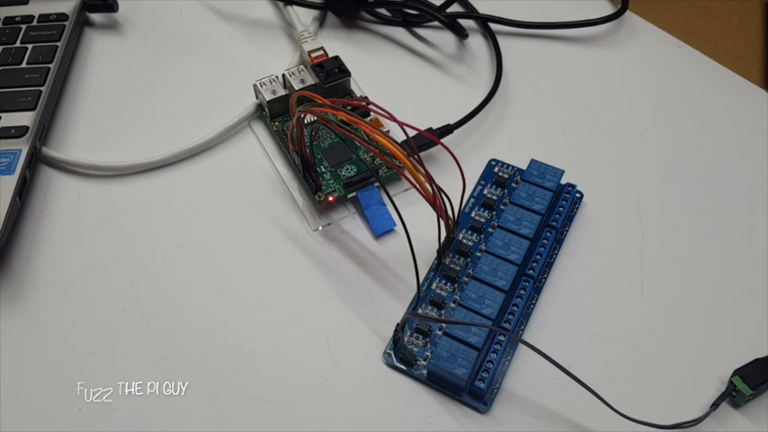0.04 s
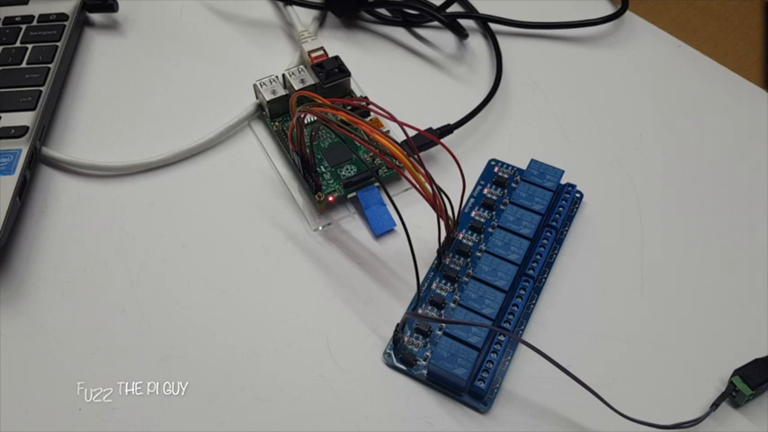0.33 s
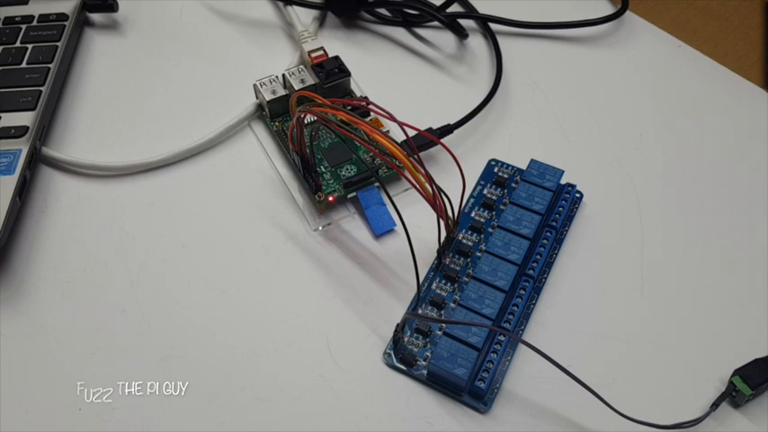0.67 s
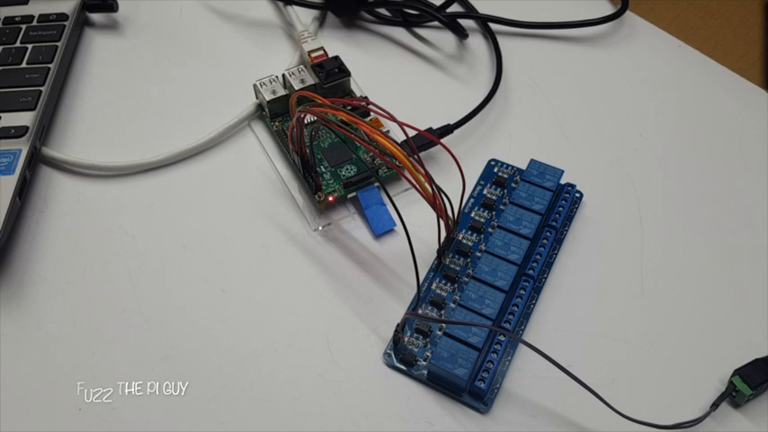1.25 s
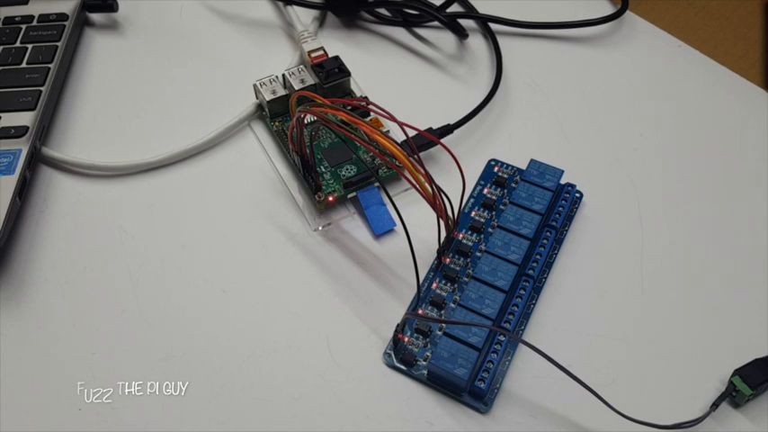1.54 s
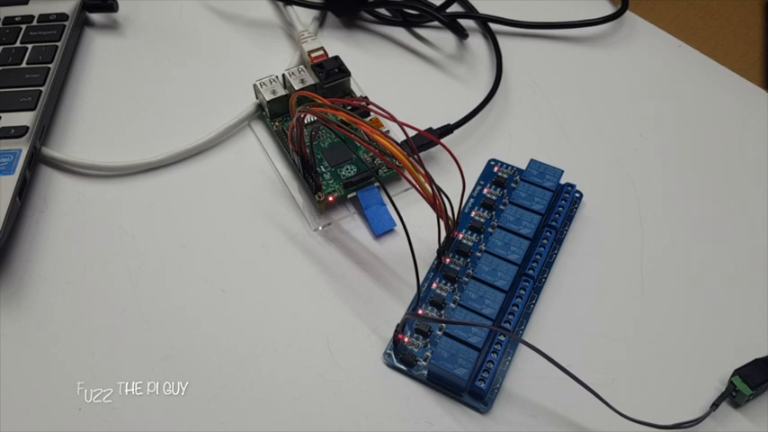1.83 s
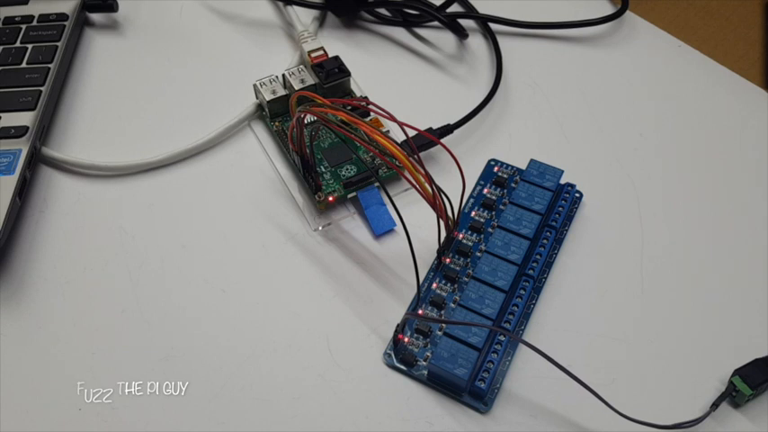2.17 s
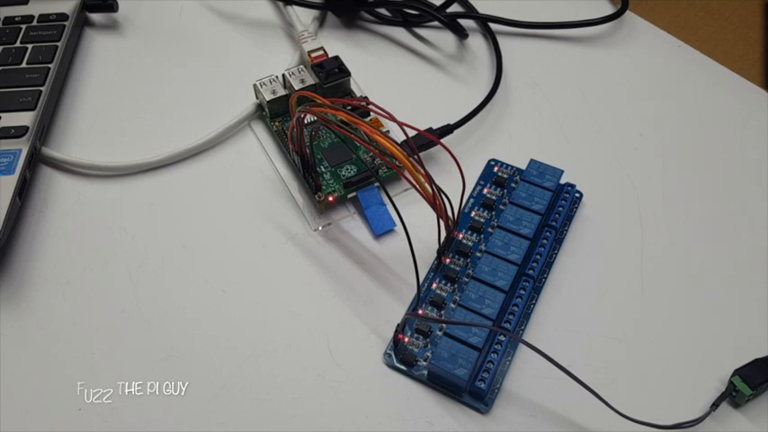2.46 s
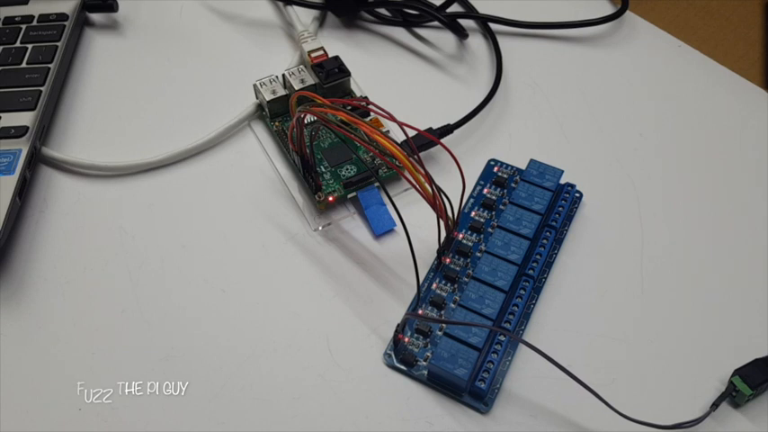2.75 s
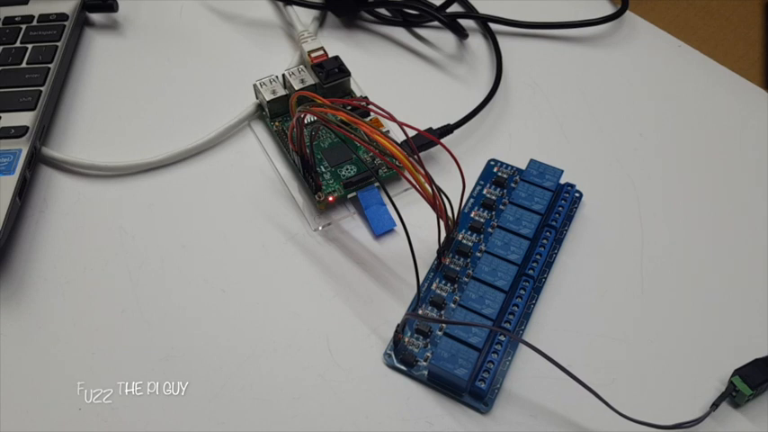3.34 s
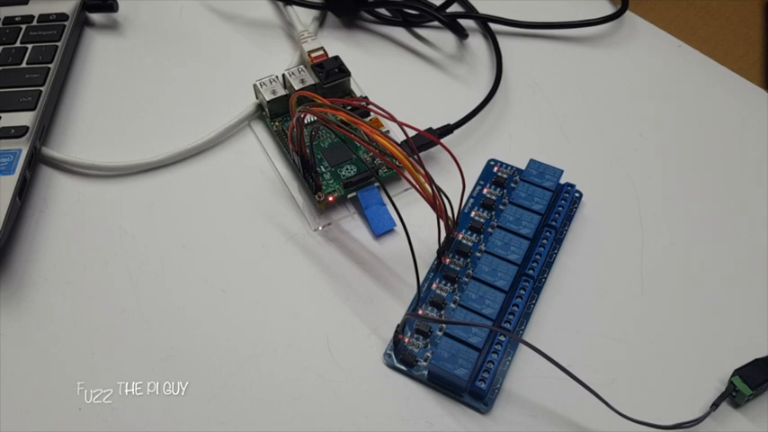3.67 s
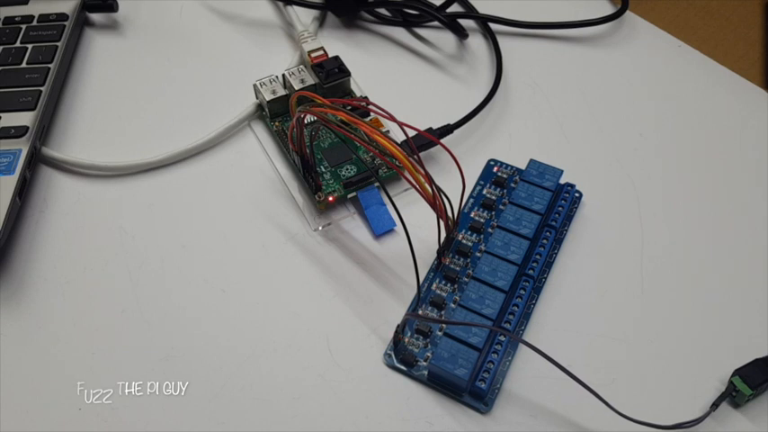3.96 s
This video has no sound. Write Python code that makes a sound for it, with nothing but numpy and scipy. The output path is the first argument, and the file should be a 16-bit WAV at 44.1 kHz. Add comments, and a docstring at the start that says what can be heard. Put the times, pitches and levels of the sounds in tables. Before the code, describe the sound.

A small relay on a desk clicks on and off in six quick bursts, sharp and close to the microphone. Some clicks carry a dull thud, and a steady electrical hum fills the small room.

```python
"""Sharp, close clicks in six bursts: a small relay on a desk switches on and off five times a burst.
Pulling in, its contact spring rattles, then the armature slams home, bounces and rings the cover.
Letting go, the spring chatters and the board under the relay rings. Two lone ticks follow at the end.
Some sharp clicks carry the dull thud of the microphone overloading.
The desk and a small room answer, over a steady electrical hum."""
import sys
import numpy as np
from scipy import signal
from scipy.fft import rfft, irfft
from scipy.io import wavfile

SR = 44100
rng = np.random.default_rng(int(sys.argv[2]) if len(sys.argv) > 2 else 0)


def unload_audio(sound):
    """Save the sound as a 16-bit wav file, at the path given as the first command line argument."""
    columns = np.transpose(np.atleast_2d(sound))
    # keep every value between -1 and 1, then stretch to whole-number steps
    steps = np.round(np.clip(columns, -1, 1) * 32767)
    wavfile.write(sys.argv[1], SR, steps.astype(np.int16))


N = 176400

# the armature slams home (time [s], blow [dB], overload thud [dB], cover ring [dB], last bounce delay [ms])
PULL_INS = [(0.1202, -3.5, -15, -17, 8.1), (.22, -5.5, -18, -5, 9.6), (0.3199, -3.5, -12.5, -7, 9.8),
            (.429, -4.5, -18, -3, 9.8), (0.5196, -4, 0.5, -11, 8), (.7694, -3.5, -14, -8.5, 8.6),
            (0.8695, -3, -12, -9, 8.3), (0.9703, -4, -1, -9, 9), (1.0694, -4, -15, -6, 9.3),
            (1.1691, -4, -15.5, -5.5, 9.4), (1.4289, -4, -5, -15, 7.4), (1.5193, -4, -13.5, -18, 7.7),
            (1.6202, -4, -10, -16, 7.7), (1.7295, -3, -8.5, -11, 10.6), (1.8296, -4.5, -14, -2, 10),
            (2.0799, -4.5, -18, -2, 10.5), (2.17, -4.5, -15.5, -4, 7.9), (2.27, -4.5, -8.5, -6, 9.8),
            (2.3801, -3.5, -10, -10, 7.3), (2.479, -3, -21, -11.5, 10.2), (2.7197, -2.5, -12.5, -6.5, 8.9),
            (2.8187, -3.5, -18, -11, 5.7), (2.909, -4.5, -17.5, -7.5, 8.6), (3.0204, -3, -11, -3, 9.5),
            (3.12, -2, -1, -2.5, 9.3), (3.4595, -3, -34, -10, 9), (3.5597, -4, -12, -6, 8.9),
            (3.6598, -2, -15, -10, 9.2), (3.76, -3.5, -11.5, -4, 9.1), (3.8592, -4.5, -14.5, -2.5, 10.3)]
# the relay lets go (time [s], level [dB])
RELEASES = [(0.168, -5), (0.2669, -5), (0.3577, -4.5), (0.4578, -4.5), (0.558, -3), (0.8178, -4),
            (0.9084, -4), (1.0071, -4), (1.107, -5), (1.2178, -4.5), (1.4673, -3.5), (1.568, -4),
            (1.668, -3.5), (1.7577, -4), (1.8775, -4.5), (2.117, -3.5), (2.2169, -4.5), (2.3173, -4),
            (2.4074, -4), (2.5077, -5), (2.7675, -4.5), (2.8566, -3.5), (2.9569, -4.5), (3.0463, -3),
            (3.1478, -4.5), (3.5069, -4), (3.5971, -2.5), (3.697, -4.5), (3.787, -4), (3.908, -3.5)]
# broad, thin colour of bounces and ticks (frequency [Hz], width [Hz], level [dB])
LIGHT_IMPACT = [(5540, 2100, -10), (8600, 2200, -6.5), (10580, 3200, 0.5), (13560, 1900, -1)]
IMPACT_DB, THUD_DB = 8, -6.5  # gains added to the levels of single events
SCATTER_DB = 0.2  # random spread from hit to hit
RATTLE_LEAD_MS = 11  # the spring rattles this long before the blow
LEFT_RIGHT = np.array([[1], [-1]])


def undb(db):
    """Decibels to amplitude."""
    return 10 ** (np.asarray(db) / 20)


def ms(x):
    """Milliseconds to seconds."""
    return x / 1000


def unit(x):
    """Scale to unit energy, averaged over the channels."""
    return x / np.sqrt(np.mean(np.sum(x ** 2, axis=-1)))


def curve(points, f):
    """Join (frequency [Hz], level [dB]) points on a log-frequency axis."""
    hz, db = np.array(points).T
    return np.interp(np.log(f + 1), np.log(hz), db)


def coloured(x, points):
    """Equalise a signal along (frequency [Hz], gain [dB]) points."""
    return irfft(rfft(x) * undb(curve(points, np.fft.rfftfreq(N, 1 / SR))), N)


def through(x, response):
    """Convolve each channel with a response."""
    return signal.fftconvolve(np.atleast_2d(x), np.atleast_2d(response), axes=-1)[:, :N]


def stereo_noise(size, width):
    """Two noises with a shared middle."""
    mid, side = rng.standard_normal((2, size))
    return (mid + width * side * LEFT_RIGHT) / np.hypot(1, width)


def tail(t60_s, width, size=22050):
    """Dense reflections that die away."""
    return unit(stereo_noise(size, width) * undb(-60 * np.arange(size) / SR / t60_s))


def body(resonances):
    """Impulse response with broad, steep-sided resonances."""
    f = np.fft.rfftfreq(2048, 1 / SR)
    power = sum(undb(db) ** 2 / (1 + (2 * (f - hz) / width) ** 2) ** 2 for hz, width, db in resonances)
    cepstrum = irfft(np.log(power + 1e-12) / 2)
    half = len(cepstrum) // 2
    cepstrum[1:half] *= 2  # fold to minimum phase: no ring ahead of the hit
    cepstrum[half + 1:] = 0
    return unit(irfft(np.exp(rfft(cepstrum))))


def impacts(times, db, decay_ms, width, variety, size=1024):
    """Brief gritty hits: one shared noise burst plus fresh noise for each, weighted by variety."""
    out = np.zeros((2, N + size))
    shared = stereo_noise(size, width)
    fade = np.exp(-np.arange(size) / SR * 1e3 / decay_ms)
    for t, level in zip(times, db):
        i = int(np.clip(t * SR, 0, N))
        out[:, i:i + size] += undb(level) * unit((shared + variety * stereo_noise(size, width)) * fade)
    return out[:, :N]


def taps(times, db):
    """Clean single pushes."""
    out = np.zeros(N)
    np.add.at(out, np.clip(times * SR, 0, N - 1).astype(int), undb(db))
    return out


def hum():
    """The bed: steady electrical hum over room rumble and faint hiss."""
    # hum tones (frequency [Hz], level [dB], left minus right [dB])
    tones = [(59.25, -53, 3), (120.14, -36, -1), (140.3, -55.5, -0.5), (232, -61.5, 2), (299, -69.5, 8),
             (410.6, -57, 7)]
    # rumble and hiss spectrum (frequency [Hz], relative density [dB])
    air_colour = [(20, -12), (48, -17), (85, 3), (135, 5), (180, -1), (230, -12), (400, -15.5), (600, -23),
                  (1500, -33.5), (4000, -39.5), (9000, -37.5), (15000, -50)]
    t, f = np.arange(N) / SR, np.fft.rfftfreq(N, 1 / SR)
    drone = sum(undb(db + pan * LEFT_RIGHT / 2) * np.sin(2 * np.pi * (hz * t + rng.uniform()))
                for hz, db, pan in tones)
    mid, side = rfft(rng.standard_normal((2, N))) * undb(curve(air_colour, f))
    width = np.clip(f / 600, .15, .8)  # narrow rumble, wide hiss
    air = irfft(mid + side * width * LEFT_RIGHT, N)
    return np.sqrt(2) * drone + undb(-45) * unit(air) * np.sqrt(N)


def reflections(x, t60_s, width, count=4, shimmer_hz=3.3):
    """Diffuse tails that crossfade, so that no two clicks ring quite alike."""
    turn = 2 * np.pi * shimmer_hz * np.arange(N) / SR
    weights = [np.sin((k // 2 + 1) * turn + k * np.pi / 2) for k in range(count)]
    return sum(through(x * weight, tail(t60_s, width)) for weight in weights) * np.sqrt(2 / count)


def desk_and_room(clicks):
    """The desk throws back tight, bright reflections; the room adds a wider, darker tail."""
    # tone of the near reflections (frequency [Hz], gain [dB])
    desk_colour = [(1000, 0.5), (10500, 1), (13500, 0)]
    # tone of the room tail (frequency [Hz], gain [dB])
    room_colour = [(1000, 8.5), (2500, 7), (4000, 2), (9800, 0.5), (12500, 0), (14500, -19), (15800, -16)]
    desk = coloured(reflections(clicks, t60_s=0.065, width=0.44), desk_colour)
    room = coloured(reflections(clicks, t60_s=0.33, width=1.0), room_colour)
    return undb(-5.5) * desk + undb(-13) * room


def stereo_image(x):
    """Two microphone ports: width and balance change with frequency."""
    # stereo width (frequency [Hz], side gain [dB])
    side_gain = [(500, -2), (1100, 1), (2200, -3), (4000, -5.5), (8000, 0), (13000, 1)]
    # stereo balance (frequency [Hz], left minus right [dB])
    balance = [(400, -8), (1000, 0), (2200, 1), (4000, -1.5), (8000, -0.3), (12500, 2.5)]
    f = np.fft.rfftfreq(N, 1 / SR)
    left, right = rfft(x)
    mid = (left + right) / 2
    side = (left - right) / 2 * undb(curve(side_gain, f))
    return irfft((mid + LEFT_RIGHT * side) * undb(LEFT_RIGHT * curve(balance, f) / 2), N)


def board(rise_ms=0.92, port_lead_rad=0.33):
    """Each movement of the armature nudges the board, whose low modes swell briefly and fade."""
    # modes of the board on the desk (frequency [Hz], level [dB], t60 [s])
    modes = [(237.5, -7.5, 0.27), (290, -8, 0.13), (668, -9.5, 0.21), (878, -3.5, 0.093), (958, -2, 0.11),
             (1146, -4.5, 0.071), (1194, 0, 0.066), (1266.6, 3, 0.072), (1450, -8.5, 0.056),
             (1603, -7.5, 0.048), (2060, -11, 0.055)]
    on = np.array(PULL_INS)[:, 0]
    off, off_db = np.array(RELEASES).T
    t = np.arange(SR // 2) / SR
    ring = np.zeros((2, len(t)))
    for hz, db, t60 in modes:
        phase = port_lead_rad * LEFT_RIGHT + 0.87 * rng.standard_normal()
        ring += undb(db - 60 * t / t60) * np.sin(2 * np.pi * hz * t + phase)
    ring *= 1 - np.exp(-t / ms(rise_ms))
    release_push = taps(off + ms(1.436), off_db - 14)
    pull_push = taps(on - ms(RATTLE_LEAD_MS), db=-25)
    return through(release_push + pull_push, unit(ring))


def overload_thud(pushes):
    """The dull thud of the microphone overloading on some sharp clicks: filtered pushes, short tail."""
    # colour of the thud (frequency [Hz], width [Hz], level [dB])
    colour = [(538, 3400, 2), (1500, 820, -5), (2900, 2300, 1.5)]
    thud = through(pushes, body(colour))
    return thud + undb(-5) * through(thud, tail(t60_s=0.085, width=1.0))


def relay_accents():
    """Accented first touches and last bounces, then two lone ticks; returns snaps and thud pushes."""
    # the relay's accents and the two closing ticks (time [s], snap [dB], overload thud [dB])
    hits = [(1.0788, -17, -3), (2.8088, -1, -31), (2.829, -11, -7.5), (3.0068, -10.5, -28),
            (3.1297, -6.5, -13), (3.7474, -10, -28), (3.9593, -8.5, -2), (3.9966, -16.5, -31)]
    t, snap_db, thud_db = np.array(hits).T
    snaps = impacts(t, IMPACT_DB + snap_db, decay_ms=0.37, width=1.0, variety=0.88)
    return through(snaps, body(LIGHT_IMPACT)), taps(t, THUD_DB + thud_db)


def chatter(times, db, length_ms, swell_db, count):
    """A spring bounces unevenly after each start, the energy shared among its hits."""
    hit = np.arange(count)
    jitter = rng.uniform(0, 1, (len(times), count)) * (hit > 0)
    progress = (hit + jitter) / count
    hit_times = times[:, None] + ms(length_ms) * progress
    levels = np.reshape(db, (-1, 1)) + swell_db * (progress - .5) - 10 * np.log10(count)
    levels += SCATTER_DB * rng.standard_normal(progress.shape)
    return impacts(hit_times.ravel(), levels.ravel(), decay_ms=0.76, width=0.91, variety=3.6)


def contact_spring():
    """The contact lifts, rattles and pings before each blow, and chatters on each release."""
    # resonances of the spring (frequency [Hz], width [Hz], level [dB])
    resonances = [(4490, 1460, -8.5), (6013, 1200, 0.5), (7310, 1400, -4), (8640, 910, -1.5),
                  (9980, 1260, -2.5), (11500, 1500, -4.5), (12740, 1760, -1), (14100, 1400, -9)]
    on = np.array(PULL_INS)[:, 0]
    off, off_db = np.array(RELEASES).T
    rattle_at = on - ms(RATTLE_LEAD_MS)
    lift = chatter(on - ms(12.4), db=-12, length_ms=2.2, swell_db=-11, count=2)
    rattle = chatter(rattle_at, db=-3, length_ms=4.6, swell_db=-2, count=5)
    release = chatter(off, db=off_db + 5.5, length_ms=7, swell_db=0.5, count=9)
    ping_db = -7.5 + SCATTER_DB * rng.standard_normal(len(on))
    ping = through(taps(rattle_at, ping_db), body([(5916, 410, 0)]))  # one narrow resonance
    return through(lift + rattle + release, body(resonances)) + ping


def armature():
    """A double blow on the core rings the cover and bounces twice; returns clicks and thud pushes."""
    # resonances of the armature on the core (frequency [Hz], width [Hz], level [dB])
    metal = [(3080, 870, -24.5), (3880, 1800, -19), (5470, 2050, -15), (7620, 1180, -2), (8700, 1400, -11),
             (10100, 1600, -6), (11500, 2500, -9.5), (12500, 1230, 2), (13600, 1450, 0), (15000, 1300, -10)]
    # resonance of the hollow plastic cover (frequency [Hz], width [Hz], level [dB])
    plastic = [(3650, 790, 0)]
    t, blow_db, thud_db, cover_db, last_ms = np.array(PULL_INS).T
    chance = rng.standard_normal((len(t), 5)).T
    drop_db = np.array([[-1], [-9], [-3.5]])  # second blow, first bounce, last bounce
    second_db, bounce_db, last_db = blow_db + drop_db + SCATTER_DB * chance[2:]
    blow_at = np.r_[t, t + ms(0.74 + .15 * chance[0])]
    bounce_at = np.r_[t + ms(4.1 + .2 * chance[1]), t + ms(last_ms)]
    blows = impacts(blow_at, IMPACT_DB + np.r_[blow_db, second_db], decay_ms=0.26, width=0.95, variety=3.1)
    bounces = impacts(bounce_at, IMPACT_DB + np.r_[bounce_db, last_db],
                      decay_ms=0.24, width=1.0, variety=9.9)
    cover = through(taps(t, cover_db - 7), body(plastic))
    clicks = through(blows, body(metal)) + through(bounces, body(LIGHT_IMPACT)) + cover
    return clicks, taps(t, THUD_DB + thud_db)


def scene():
    """The relay, reflected by the desk and the room, with overload thuds, over the hum."""
    blows, blow_pushes = armature()
    accents, accent_pushes = relay_accents()
    clicks = blows + contact_spring() + board() + accents
    mix = clicks + desk_and_room(clicks) + overload_thud(blow_pushes + accent_pushes)
    return stereo_image(mix) + hum()


def record(dry, ceiling=.8, top_hz=16000):
    """Hard-clip the highest peaks, then cut the top treble steeply."""
    lowpass = signal.ellip(8, .2, 70, top_hz, fs=SR, output="sos")
    return signal.sosfilt(lowpass, np.clip(dry, -ceiling, ceiling))


dry = scene()
out = record(dry)
unload_audio(out)
```